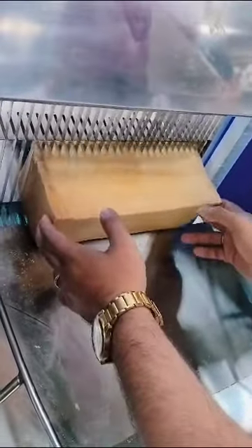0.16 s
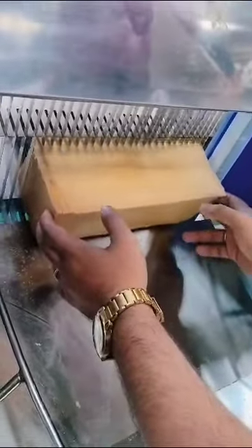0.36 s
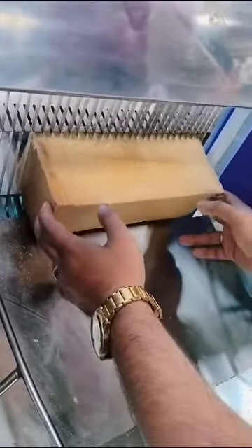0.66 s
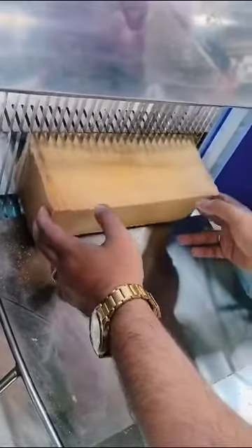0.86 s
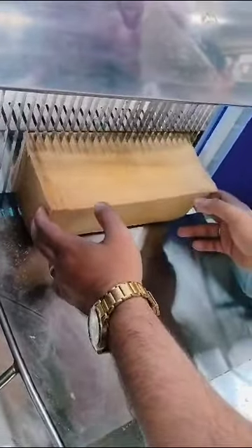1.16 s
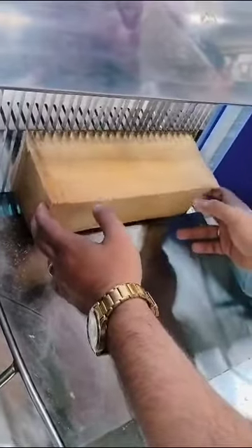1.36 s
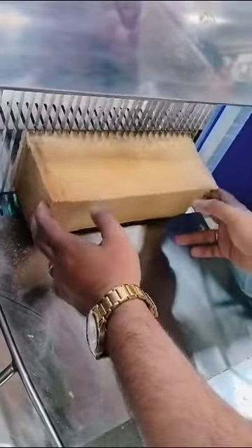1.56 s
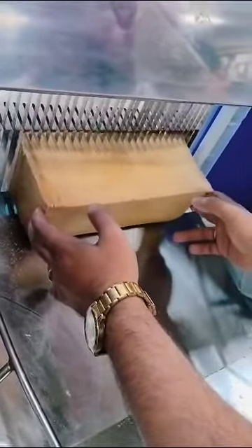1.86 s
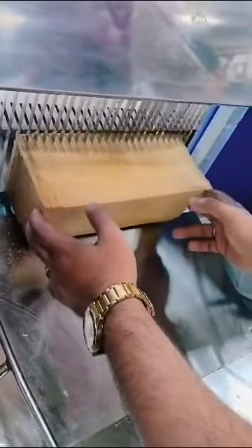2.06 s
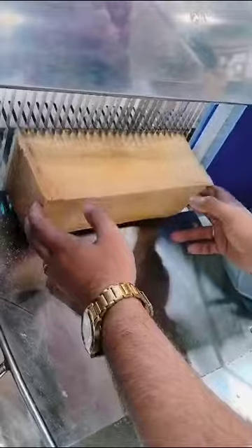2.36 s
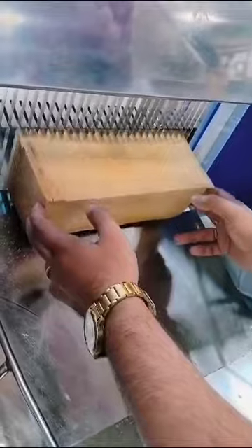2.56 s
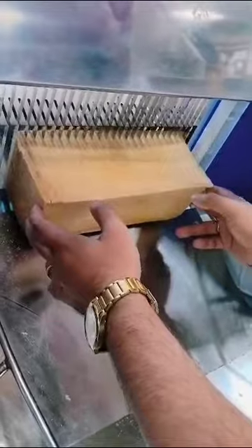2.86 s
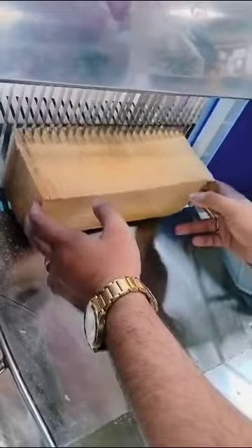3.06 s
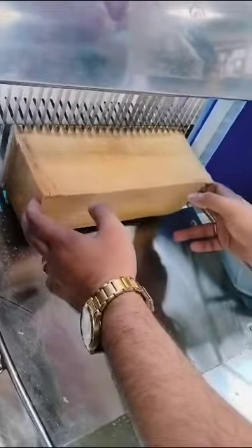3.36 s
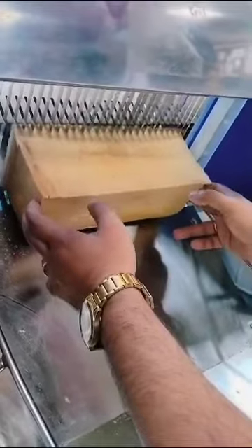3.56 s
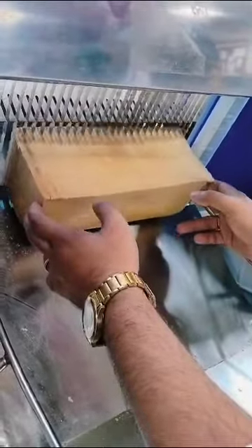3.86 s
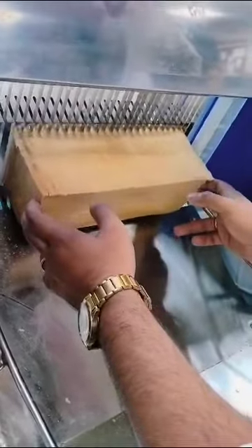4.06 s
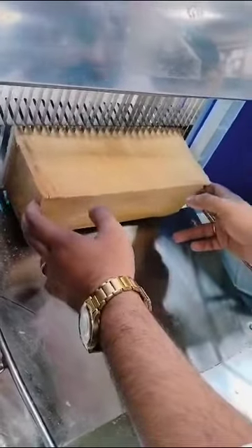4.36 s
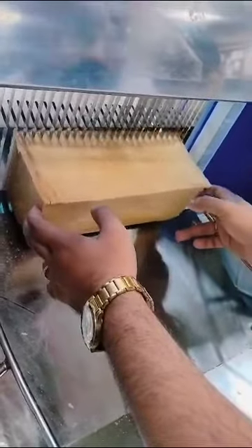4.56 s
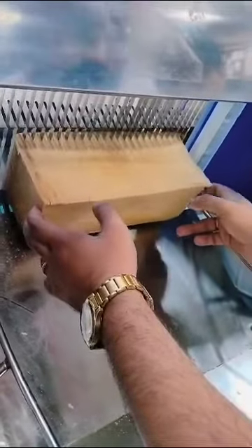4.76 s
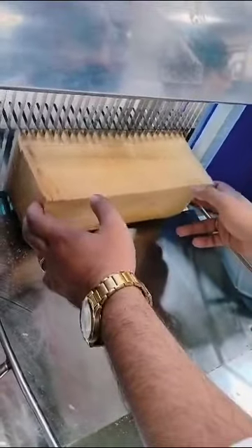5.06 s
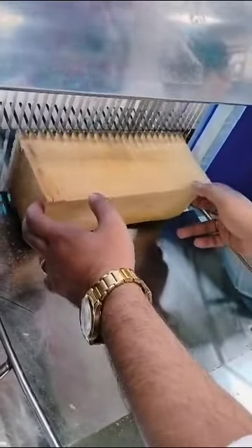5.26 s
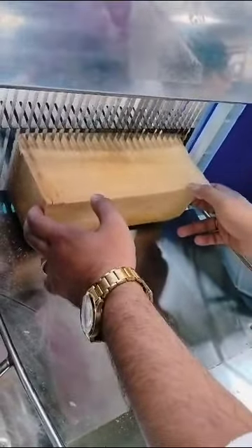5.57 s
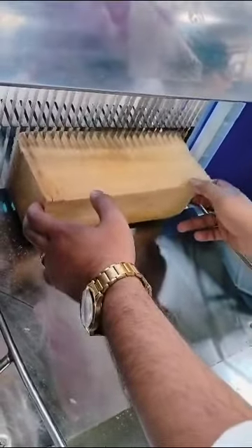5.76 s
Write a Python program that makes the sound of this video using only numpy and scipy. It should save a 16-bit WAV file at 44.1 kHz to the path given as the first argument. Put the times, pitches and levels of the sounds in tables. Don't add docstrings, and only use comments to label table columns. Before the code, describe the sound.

Close up, an electric slicer buzzes through a loaf, its casing humming and whining steadily while frames rattle and blades rasp in a quick flutter.

```python
import sys
import numpy as np
from scipy import signal
from scipy.fft import rfft, irfft
from scipy.io import wavfile
from scipy.ndimage import uniform_filter1d

SR = 44100
rng = np.random.default_rng(int(sys.argv[2]) if len(sys.argv) > 2 else 0)


def put_to_file(sound):
    columns = np.atleast_2d(sound).T
    safe = np.clip(columns, -1, 1)
    whole_steps = np.round(safe * 32767)
    wavfile.write(sys.argv[1], SR, whole_steps.astype(np.int16))


def nominal_scale(level):
    x = np.asarray(level, float) / 20
    return 10 ** x


N = 260631
TIME = np.arange(N) / SR
FREQ = np.arange(N // 2 + 1) * SR / N + 1e-3

MAINS_PULL_HZ, CRANK_HZ = 99.96, 8.8992
PULL_START_TURNS, CRANK_START_TURNS, STROKE_LAG_TURNS = .09, .822, .415
CROSS_LOW_HZ, CROSS_HIGH_HZ = 1150, 1400
BLADE_LIKENESS, BLADE_LAG_S = .33, 63 / SR
TIPS_HZ, CATCH_S = 4400, 0.018
JOLT_S, LOOSE_DB, LOOSE_PER_S = .045, 0.37, 14.
EASE_S, GAIN_HZ_PER_S, SAG_PER_GAIN = 3.3, .0139, 1.2
WHINE_ORDER, WHINE_SLIP_ORDERS = 50, 34
GAINED_TURNS = .5 * GAIN_HZ_PER_S * np.maximum(TIME - EASE_S, 0) ** 2

# freq_hz, left_db_per_hz, right_db_per_hz
CLATTER_SPECTRUM = [(55, -84, -75), (78.5, -67.5, -68.5), (135, -54, -52.5), (140, -52, -54),
                    (188, -44, -45.5), (218, -48.5, -45.5), (248, -47, -43.5), (304, -41.5, -45.5),
                    (377, -43, -42), (495, -45.5, -51.5), (723, -48.5, -50.5), (841, -40, -42),
                    (1101, -56, -55), (1470, -60, -59)]
# freq_hz, width_hz, left_lift_db, right_lift_db
PANEL_RINGS = [(241, 27, 6.5, 2), (287, 2.5, 8, 7), (379.6, 12, 7, -1.5), (460, 35, 2, 5.5),
               (535.6, 18, 8, -6.5), (606.6, 9.9, 3.5, 6.5), (770, 37, 2, -2), (947, 24, 5.5, 2),
               (1053, 30, 3.5, 6)]
# freq_hz, left_right_likeness (-1 to 1)
PORT_LIKENESS = [(60, .9), (130, 1), (200, 0.97), (440, 0.91), (620, 0.18), (760, -0.14), (870, 0.12),
                 (1110, 0.85), (1300, -0.056)]
# time_s, clatter_lift_db
FRAME_JOLTS = [
    (0, 3),
    (.32, 2.5),
    (.85, 1),
    (2.42, 1),
    (4.38, 0.5),
    (4.92, 3),
    (5.9, 1.5),
]
# pull_order, crank_order, level_db_rms, left_minus_right_db, left_lead_rad
LOW_CASING_HUM = [(0, 7, -54.8, -2, 0.1), (-1, 20, -51.1, -3, -0.1), (0, 9, -46.0, -3, -0.2),
                  (1, -2, -48.3, 0, 0.1), (1, -1, -51.3, 3, 0.6), (0, 11, -44.9, 5, 0.3),
                  (1, 0, -43.4, 1, 0.6), (0, 12, -49.0, 2, 0.3), (1, 2, -47.8, 2, -0.0),
                  (0, 14, -45.3, 2, 0.1), (0, 15, -46.1, 0, 0.3), (1, 4, -44.2, 1, 0.1)]
# pull_order, crank_order, level_db_rms, left_minus_right_db, left_lead_rad
CASING_HUM = [(0, 18, -36.3, -2, 0.2), (0, 19, -38.8, 0, -0.2), (0, 20, -25.2, 0, 0.0),
              (1, 9, -37.9, -1, -0.0), (2, -2, -22.3, 0, -0.1), (0, 21, -38.6, -1, -0.1),
              (1, 10, -38.3, -1, 0.0), (2, -1, -28.1, -1, 0.1), (0, 22, -32.4, -1, 0.1),
              (1, 11, -31.5, -2, 0.1), (2, 0, -28.9, -1, -0.0), (0, 24, -37.1, 4, 1.2),
              (1, 15, -34.0, 3, -0.1), (2, 9, -38.4, -1, 0.0), (3, -2, -34.8, 0, 0.0),
              (0, 32, -34.7, 1, 0.1), (2, 14, -37.5, 1, -0.3), (2, 16, -35.9, 0, -0.1)]
# pull_order, crank_order, level_db_rms, left_minus_right_db, left_lead_rad
MOTOR_WHINE = [(0, 52, -40.4, 9, 0.7), (1, 53, -43.4, 5, 2.2), (2, 66, -35.5, 8, 3.1),
               (2, 68, -38.1, 2, 0.9), (2, 70, -35.8, 8, 0.3), (3, 59, -36.2, 6, 1.1),
               (2, 71, -36.0, 12, 0.1), (3, 60, -33.6, 7, -0.2), (2, 73, -30.8, -2, 0.4),
               (3, 62, -25.8, -1, 0.4), (3, 63, -36.2, -3, 1.2), (3, 65, -38.4, 5, 1.1),
               (3, 68, -38.3, 10, 0.8), (3, 69, -40.4, 7, 2.5), (3, 70, -40.9, -5, 1.9),
               (3, 73, -32.4, 6, 0.3)]
# pull_order, crank_order, level_db_rms,
# left_minus_right_db, left_lead_rad
MORE_CASING_LINES = [(2, 17, -36.7, 2, -0.1), (0, 40, -39.5, 1, 0.1), (2, 20, -37.3, 4, 0.1),
                     (4, 0, -39.4, 4, 0.0), (2, 24, -42.1, 0, 0.1), (2, 29, -42.1, 0, 0.3),
                     (3, 34, -45.0, -1, 0.0), (1, 84, -38.2, 8, -0.2), (3, 64, -38.4, -8, 2.1),
                     (3, 71, -41.6, -4, -2.4), (2, 84, -39.9, 1, 0.8), (4, 68, -43.5, -2, -1.8),
                     (4, 70, -44.1, -5, -0.5), (0, 8, -57.5, -1, 0.0), (0, 6, -64.5, -1, 0.0)]
# freq_hz, left_db_per_hz, right_db_per_hz
RASP_SPECTRUM = [(940, -46.5, -30), (1314, -54.5, -59), (1807, -63.5, -65.5), (2210, -66.5, -68.5),
                 (2467, -59, -65.5), (2750, -66, -68), (4160, -68.5, -69), (4640, -74, -77),
                 (5860, -78, -74.5), (6220, -81, -83.5), (7490, -99, -94), (8100, -106.9, -109.8),
                 (10500, -112.9, -115.4), (15000, -119.0, -118.1)]
# freq_hz, width_hz, left_lift_db, right_lift_db
BLADE_RINGS = [(1703, 24, 5, 7), (2686, 26, 7, 5), (3540, 30, 3, 2), (3810, 26, 7, 6), (3895, 60, 5, 4),
               (4450, 70, 2, 5), (5006, 20, 2, 4), (5090, 110, 2, 4), (5467, 24, 5, 4), (5783, 18, 6, 12),
               (5858, 22, 6, 6), (6650, 90, 3, 5)]
# freq_hz, width_hz, left_lift_db, right_lift_db
MORE_BLADE_RINGS = [(1190, 28, 2.5, 6.5), (1768, 55, 7.5, 9.5), (1897, 64, 8, 2), (2160, 66, 0.5, 2.5),
                    (2313, 77, 3.5, 9), (2540, 120, 5.5, 6.5), (2701, 42, 5, 4), (2830, 31, 3.5, -2),
                    (4206, 88, 0, 5.5), (8140, 100, 3.5, 1), (10200, 560, 8, 4), (11600, 580, 10.5, 3.5)]
# time_s, level_db
HAND_PRESSURE = [(0, 0), (.2, -1.5), (.45, .5), (1.15, -1.5), (1.45, .5), (1.6, -1), (1.85, 1.5),
                 (2.05, -1.5), (2.4, 1.5), (2.6, -.5), (3.4, 0), (3.65, -2), (3.78, 2), (4.1, -.5),
                 (4.45, .5), (4.6, -1), (5.05, .5), (5.91, -1)]
# time_s, rasp_lift_db, extra_tip_lift_db
CRUST_CATCHES = [(.07, 2.5, 1.5), (.17, -1.5, 6), (.51, 1, 2.5), (.63, 2, 1.5), (.85, 0, 3),
                 (1.98, 3.5, 1.5), (2.32, -0.5, 4), (2.88, 2, 1.5), (3.44, 1.5, 1.5), (4.45, 0, -2),
                 (5.13, 3.5, 3), (5.02, 2.5, -1), (4.92, 2.5, -1), (5.35, 0.5, -0.5), (5.47, 3, -2),
                 (5.57, 1.5, 1.5), (5.69, 3, 1.5)]


def on_log(table, col):
    table = np.array(table)
    return np.interp(np.log(FREQ), np.log(table[:, 0]), table[:, col])


def ports(likeness, lag_s):
    mid, side = rfft(rng.standard_normal((2, N)))
    mid = mid * np.sqrt((1 + likeness) / 2)
    side = side * np.sqrt((1 - likeness) / 2)
    late = np.exp(-2j * np.pi * FREQ * lag_s)
    return np.array([(mid + side) * late, mid - side])


def colour(spectrum, rings):
    db = np.array([on_log(spectrum, 1), on_log(spectrum, 2)])
    for hz, width_hz, left_db, right_db in rings:
        resonance = 1 / (1 + (2 * (FREQ - hz) / width_hz) ** 2)
        db = db + np.outer([left_db, right_db], resonance)
    return nominal_scale(db) * np.sqrt(SR / 2)


def walk(rate_hz):
    hold = int(SR / rate_hz)
    steps = np.repeat(rng.standard_normal(N // hold + 1), hold)
    return 1.08 * uniform_filter1d(uniform_filter1d(steps, hold), hold)[:N]


def swells(table, col, width_s):
    table = np.array(table)
    bells = np.exp(-.5 * ((TIME - table[:, :1]) / width_s) ** 2)
    return table[:, col] @ bells


def clatter(share):
    repeat = .15
    comb = np.sqrt(1 - repeat ** 2) / (1 - repeat * np.exp(-2j * np.pi * FREQ / CRANK_HZ))
    thinning = np.minimum(FREQ / CLATTER_SPECTRUM[0][0], 1) ** 3.6
    likeness = np.clip(on_log(PORT_LIKENESS, 1), -.99, .99)
    spectrum = ports(likeness, 0) * colour(CLATTER_SPECTRUM, PANEL_RINGS)
    noise = irfft(spectrum * comb * thinning * share, N)
    level_db = swells(FRAME_JOLTS, col=1, width_s=JOLT_S) + LOOSE_DB * walk(LOOSE_PER_S) - 0.28
    return noise * nominal_scale(level_db)


def casing_lines(table, crank_turns, wobble_db):
    pull_turns = MAINS_PULL_HZ * TIME + PULL_START_TURNS - SAG_PER_GAIN * GAINED_TURNS
    sides = np.array([[.5], [-.5]])
    out = np.zeros((2, N))
    for pull_order, crank_order, db, pan_db, lead_rad in table:
        slip = WHINE_SLIP_ORDERS * GAINED_TURNS * (crank_order > WHINE_ORDER)
        turns = pull_order * pull_turns + crank_order * crank_turns - slip + rng.random()
        tone = np.sin(2 * np.pi * turns + lead_rad * sides)
        level = np.sqrt(2) * nominal_scale(db + wobble_db * walk(3.04))
        out += level * nominal_scale(pan_db * sides) * tone
    return out


def rasp(crank_turns, share, stroke_db=0.45, uneven_db=0.27, tip_db=0.94, grain_db=1.27, vary_db=0.5):
    stroke = np.cos(4 * np.pi * crank_turns)
    db = np.interp(TIME, *np.transpose(HAND_PRESSURE))
    db += swells(CRUST_CATCHES, col=1, width_s=CATCH_S)
    db += stroke_db * stroke + uneven_db * np.cos(2 * np.pi * crank_turns)
    db += grain_db * walk(120.) + vary_db * walk(18.)
    force = nominal_scale(db) / np.sqrt(np.mean(nominal_scale(db) ** 2))
    friction = irfft(ports(BLADE_LIKENESS, BLADE_LAG_S), N) * force
    crust_db = swells(CRUST_CATCHES, col=2, width_s=CATCH_S) + tip_db * stroke + .9 * walk(25.) - 0.5
    crust = friction * nominal_scale(crust_db)
    tips = 1 / (1 + (TIPS_HZ / FREQ) ** 8)
    mixed = rfft(friction) * (1 - tips) + rfft(crust) * tips
    return irfft(mixed * colour(RASP_SPECTRUM, BLADE_RINGS + MORE_BLADE_RINGS) * share, N)


def scene():
    crank_turns = CRANK_HZ * TIME + CRANK_START_TURNS + GAINED_TURNS
    high = np.clip(np.log(FREQ / CROSS_LOW_HZ) / np.log(CROSS_HIGH_HZ / CROSS_LOW_HZ), 0, 1)
    hum = nominal_scale(.8) * casing_lines(LOW_CASING_HUM + CASING_HUM, crank_turns, wobble_db=.5)
    whine = nominal_scale(1.3) * casing_lines(MOTOR_WHINE + MORE_CASING_LINES, crank_turns, wobble_db=.9)
    rumble = clatter(np.sqrt(1 - high))
    cutting = rasp(crank_turns - STROKE_LAG_TURNS, np.sqrt(high))
    return hum + whine + rumble + cutting


def band_limit(x):
    return signal.sosfilt(signal.butter(12, 15720, fs=SR, output="sos"), x)


def record(dry):
    knee, port_hz = .9, 35
    rounded = np.tanh(knee * dry) / knee
    heard = signal.sosfilt(signal.butter(2, port_hz, "high", fs=SR, output="sos"), rounded)
    return band_limit(heard)


dry = scene()
out = record(dry)
put_to_file(out)
```